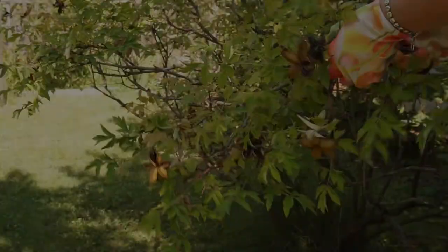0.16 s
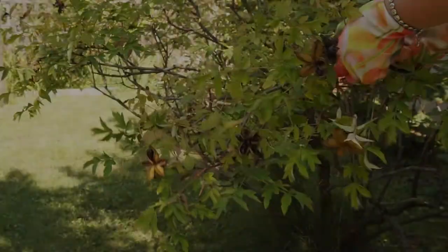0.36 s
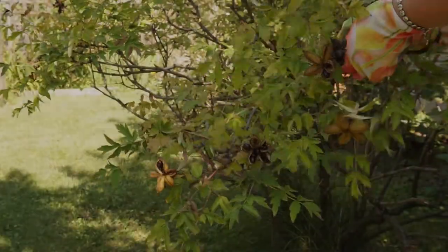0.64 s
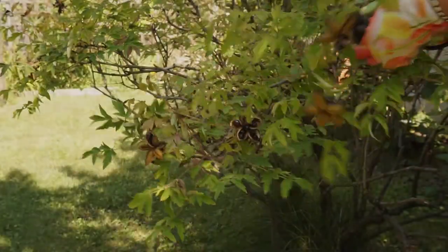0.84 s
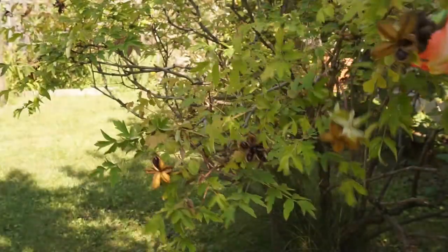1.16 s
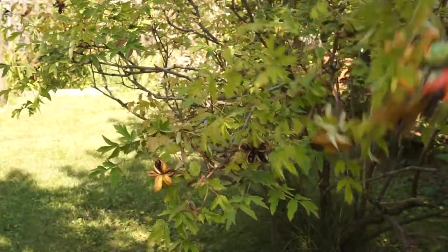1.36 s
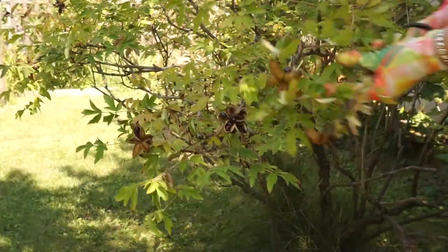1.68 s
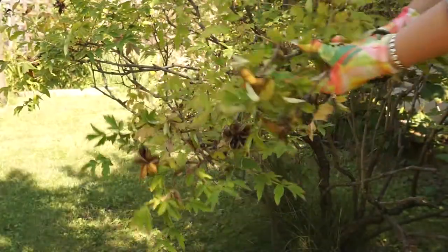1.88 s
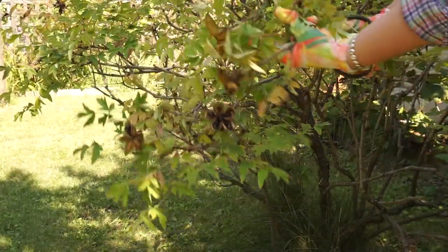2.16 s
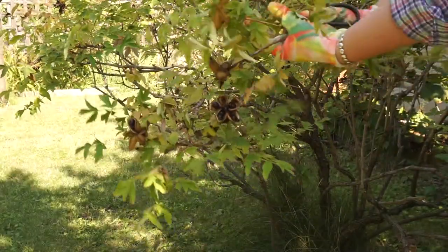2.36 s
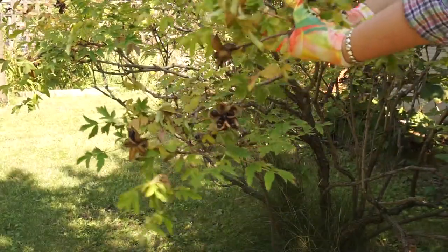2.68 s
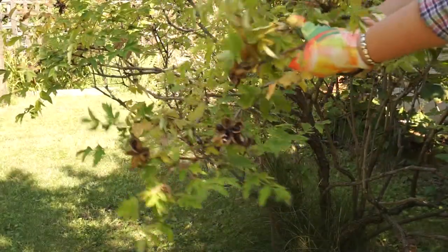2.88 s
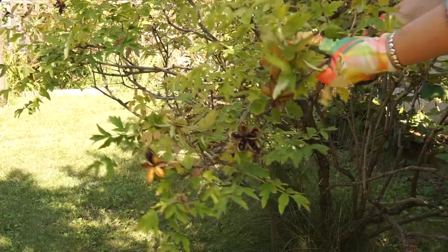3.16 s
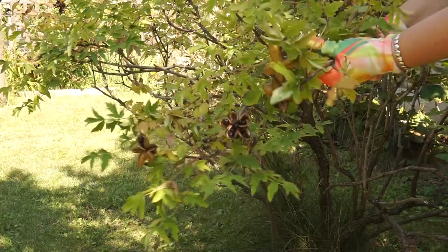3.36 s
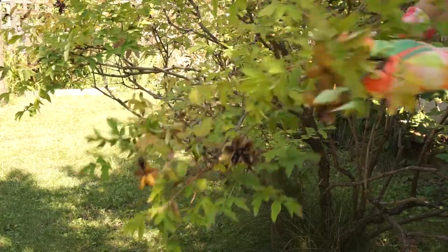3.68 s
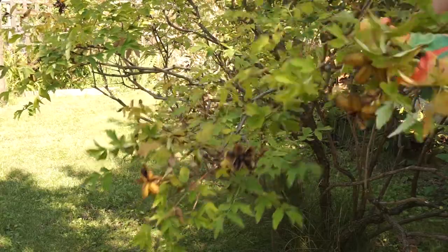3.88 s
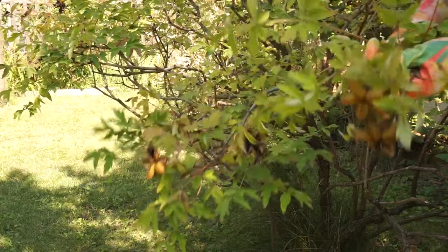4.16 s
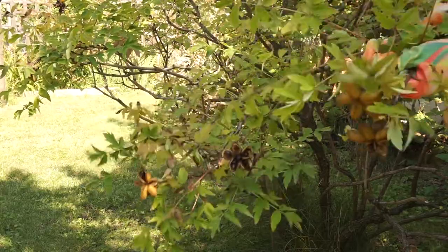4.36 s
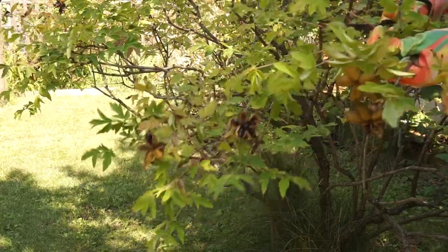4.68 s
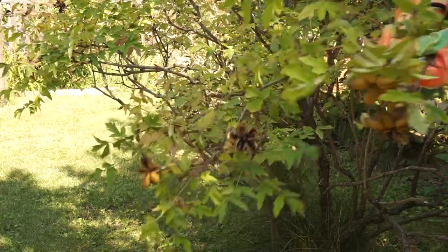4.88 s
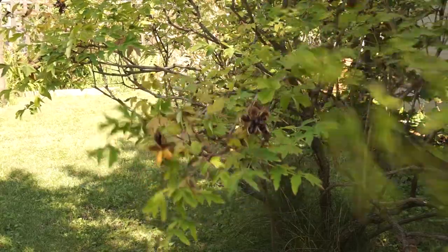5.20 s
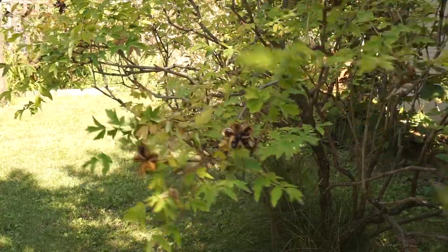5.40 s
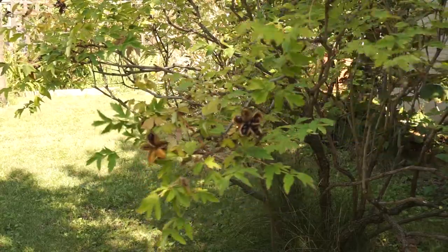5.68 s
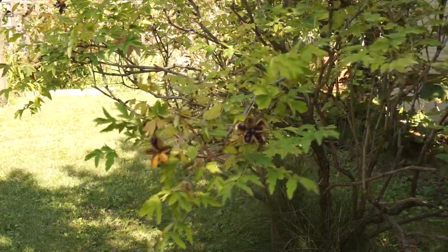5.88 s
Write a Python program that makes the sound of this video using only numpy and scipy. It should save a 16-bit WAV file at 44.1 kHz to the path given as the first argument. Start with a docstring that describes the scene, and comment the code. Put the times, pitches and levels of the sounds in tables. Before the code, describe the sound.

A quiet garden with a soft, steady outdoor hush and a very faint, high, fuzzy machine whine far away. Close by, a shrub is pruned: a tiny click at 0.5 s, a clearer snap near 0.67 s with a small rustle, and a light crack just before 1 s. From about 1.1 s a rooster crows once, dominating everything: a husky short note, two more brief notes around 1.35 and 1.7 s, then a long cry from 2.06 to 3.5 s, bright at first, growling and roughening as it falls and collapses, with a short outdoor echo. At 3.4 s a sharp double twig snap overlaps its end. A barely audible low tone trails at 3.6 s. Rustles and small snips follow around 3.7, 4.1, 4.4 and 4.8-4.9 s, then only leaf brushing near 5.2-5.5 and 5.9 s. The distant saw-like whine hisses and sags lowest around 4.3 s, then climbs back toward the end.

```python
"""Rooster and pruning in a garden

A rooster crows once: three short notes and a long falling one that breaks into a rasp. It is built from
gliding partials, half-pitch growl and puffed noise, with one wall echo and a faint low tone after it.
Close by, someone prunes a shrub: decaying noise bursts snap the twigs, grainy noise rustles the leaves.
Far off a machine, perhaps a saw, whines in narrow noise bands, sags under load and recovers,
over a soft outdoor hush of coloured noise."""
import sys
import numpy as np
from scipy import signal
from scipy.fft import rfft, irfft, next_fast_len
from scipy.io import wavfile
from scipy.ndimage import uniform_filter1d, map_coordinates

SR = 44100
rng = np.random.default_rng(int(sys.argv[2]) if len(sys.argv) > 2 else 0)


def generate_wav(signal):
    """Clip the signal to [-1, 1] and save it as 16-bit WAV at the path in sys.argv[1]."""
    frames = np.transpose(np.atleast_2d(signal))
    scaled = np.clip(frames, -1, 1) * 32767
    pcm = np.round(scaled).astype(np.int16)
    wavfile.write(sys.argv[1], SR, pcm)


N = 266364

# the four notes of the crow, with base levels:
# (start [s], end [s], third partial [dB], edge [dB], sheen [dB], huskiness at the start [0-1])
CROW_NOTES = [(1.073, 1.234, -52, -50, -46.5, 0.7), (1.348, 1.687, -46, -49, -57, .02),
              (1.684, 1.93, -48, -46.5, -55.5, 0.21), (2.058, 3.51, -57, -49, -50, 0)]
# the syrinx scoops up into each note; the last one sinks and collapses: (time [s], pitch [Hz])
CROW_PITCH = [
    [(1.09, 556.7), (1.108, 613.5), (1.125, 693), (1.3, 692)],
    [(1.34, 689.2), (1.39, 723), (1.416, 730), (1.552, 736.3), (1.67, 722.8)],
    [(1.73, 698.5), (1.79, 729.7), (1.91, 722.5), (1.95, 700)],
    [(2.07, 677.4), (2.11, 734.7), (2.14, 755.5), (2.16, 802.4), (2.196, 792), (2.41, 795.9), (2.51, 764.6),
     (2.542, 786), (2.58, 769), (2.7, 748.7), (2.76, 732.3), (2.83, 722.6), (2.88, 702.5), (3.18, 674),
     (3.3, 645.4), (3.318, 543), (3.37, 539.3), (3.47, 476.6), (3.58, 405)],
]
# strong partials of the short notes: (time [s], fundamental [dB], second [dB], fourth [dB])
SHORT_NOTE_LEVELS = [
    [(1.075, -57, -28.5, -62), (1.097, -44, -43, -44), (1.109, -30.5, -44.5, -55),
     (1.133, -35.5, -29, -40.5), (1.171, -32.5, -26.5, -35), (1.217, -31.5, -22.5, -44),
     (1.235, -31.5, -23.5, -42)],
    [(1.355, -53, -48, -59), (1.377, -27, -35, -37), (1.443, -32.5, -23.5, -46.5),
     (1.485, -35, -27.5, -39.5), (1.579, -39.5, -24.5, -43.5), (1.619, -30.5, -38.5, -39.5),
     (1.675, -34.5, -29, -40.5)],
    [(1.69, -34.5, -34.5, -52), (1.786, -31, -29.5, -40), (1.806, -39, -28, -49),
     (1.842, -36.5, -36.5, -51), (1.866, -36, -26, -43), (1.894, -32.5, -27.5, -80),
     (1.92, -39.5, -28.5, -41.5)],
]
# the same for the long note: (time [s], fundamental [dB], second [dB], fourth [dB])
LONG_NOTE_LEVELS = [(2.065, -32.5, -39.5, -52), (2.117, -45, -24.5, -44.5), (2.145, -28, -19.5, -62.5),
                    (2.161, -29, -26.5, -54), (2.231, -32, -24.5, -75), (2.259, -33, -25, -52),
                    (2.291, -34, -25, -77), (2.315, -33.5, -27.5, -86), (2.343, -34, -25, -54),
                    (2.401, -31, -33, -59), (2.421, -33.5, -25.5, -61), (2.477, -32, -37.5, -66),
                    (2.509, -33.5, -23, -53.5), (2.777, -42.5, -28.5, -55.5), (2.825, -61, -24.5, -64),
                    (2.853, -40.5, -34, -52), (2.947, -37.5, -23, -49.5), (3.003, -37, -35.5, -51),
                    (3.031, -38.5, -28.5, -61), (3.053, -39.5, -33, -40.5), (3.093, -51.5, -48, -42),
                    (3.141, -43, -34, -41), (3.169, -38.5, -47, -39), (3.199, -40, -27.5, -40.5),
                    (3.299, -34, -41.5, -54), (3.327, -42, -36, -41.5), (3.397, -47, -47, -50),
                    (3.445, -42.5, -34.5, -71), (3.481, -50, -40.5, -41), (3.52, -51, -37, -73)]
# the voice breaks at the edges of notes and when strained:
# (start [s], end [s], chaos [0-1], rasp [dB], half-pitch growl [dB])
VOICE_BREAKS = [(1.071, 1.076, 0.75, -38, -39), (1.105, 1.149, 0.27, -39, -47.5),
                (1.229, 1.243, 0.5, -36, -38.5), (1.345, 1.387, 0.37, -34.5, -39),
                (1.395, 1.5, 0.44, -53, -61), (1.677, 1.759, 0.63, -31.5, -38.5),
                (1.917, 1.938, 0.66, -38.5, -36.5), (1.95, 2.044, 0, -50, -47),
                (2.055, 2.083, .6, -33.5, -38.5), (2.151, 2.18, 0.02, -61, -58),
                (2.606, 2.707, 0.22, -44, -35.5), (2.715, 2.825, 0.32, -42, -32),
                (3.029, 3.296, 0.05, -53.5, -46), (3.285, 3.362, 0.18, -54, -42.5),
                (3.372, 3.42, 0.71, -41, -45), (3.469, 3.524, 0.48, -52, -47)]
# throat and beak colour of the puffed air: (frequency [Hz], relative level [dB])
RASP_COLOUR = [(200, -59), (380, -106), (600, -2.5), (780, -5), (1000, -15.5), (1500, -3), (1900, -4),
               (2300, -17.5), (2800, -9.5), (3300, -43), (6000, -49.5)]
# colour of the half-pitch growl: (frequency [Hz], relative level [dB])
GROWL_COLOUR = [(200, -28), (370, -24.5), (560, 2.5), (950, 0.5), (1130, -1), (1700, 6.5), (1850, 1.5),
                (1950, -9), (2150, -23), (2600, -23.5), (3500, -37)]
# colour of the brassy edge: (frequency [Hz], relative level [dB])
EDGE_COLOUR = [(2300, -71), (3300, 5), (3750, 21), (4000, 11), (4400, 12.5), (4800, 11), (5120, 14.5),
               (5500, -19), (5900, -5.5), (6400, -16.5), (7000, -34)]
# colour of the highest partials in a clear voice: (frequency [Hz], relative level [dB])
SHEEN_COLOUR = [(4700, -80), (5500, -4.5), (6300, -1), (7100, -6.5), (8000, -1.5), (8700, -0.5), (9500, -5),
                (10300, -11), (11200, -7), (13400, -1.5), (13900, -22.5), (16000, -18)]
# colour of the highest partials in a husky voice: (frequency [Hz], relative level [dB])
HUSKY_COLOUR = [(3000, -80), (4700, -17), (5400, 5.5), (5900, 10), (6500, -1.5), (7000, -7), (7700, -4),
                (9500, -9.5), (11200, -7.5), (12500, -21.5), (14000, -49)]
# reflections tip each frequency to one side: (frequency [Hz], left over right [dB])
SIDE_LEAN = [(600, 0.5), (675, 2), (705, -2), (722, -3.5), (735, -6.5), (765, 1), (795, -9.5), (1000, 3.5),
             (1300, 2.5), (1345, 7), (1385, -6.5), (1415, 0), (1445, 2.5), (1470, 6), (1540, -2.5),
             (1590, 6), (1700, -2)]
# a wall sends the crow back, to the left and the right ear: (delay [s], level [dB])
WALL_ECHOES = [(.048, -23.5), (.0484, -12.5)]
# twigs snapping: (time [s], relative level [dB], wood relative to crack [dB])
TWIG_SNAPS = [(0.5, -48, -2), (0.6599, -45, 12.5), (0.665, -30, 0.5), (0.6711, -40.5, 8.5),
              (0.976, -32, -32), (0.99, -49, -24), (1.276, -42, -9), (1.34, -37.5, -11), (1.568, -36.5, 4),
              (3.38, -26, 3.5), (3.387, -21.5, 3), (3.55, -43, -17), (3.676, -38.5, -5), (3.708, -44, -1),
              (4.127, -41.5, -8), (4.368, -42.5, 5), (4.799, -37.5, 3.5), (4.809, -40.5, 3.5),
              (4.893, -37, -20), (4.929, -46, -14)]
# resonances of the twig wood: (centre [Hz], width [Hz], relative level [dB])
TWIG_MODES = [(1030, 72, 1), (1950, 560, -1.5), (3440, 1230, -4.5)]
# colour of the crack: (frequency [Hz], relative level [dB])
CRACK_COLOUR = [(1500, -26.5), (3500, -7), (5500, 1), (9000, -1.5), (14000, -9), (16000, -0.5)]
# the shrub being handled: (height of the rustle [s], half length to 1/e [s], level [dB])
LEAF_RUSTLES = [(0.28, 0.062, -75), (0.708, 0.036, -62.5), (0.88, 0.027, -69.5), (1.419, 0.11, -55),
                (3.67, 0.18, -62.5), (4.118, 0.072, -63), (4.911, 0.044, -57.5), (5.207, 0.07, -62),
                (5.332, 0.067, -70), (5.494, 0.019, -64), (5.92, 0.073, -63)]
# colour of the leaves: (frequency [Hz], relative level [dB])
LEAF_COLOUR = [(300, -37), (1500, -28), (4000, -9.5), (7000, -8.5), (10000, -8), (13000, -14), (16000, -15)]
# the far machine sags under load and recovers: (time [s], reference pitch [Hz])
MACHINE_PITCH = [(0, 2840), (2.8, 2896), (3.6, 2525), (3.85, 2420), (4.33, 2350), (4.7, 2417), (5.05, 2524),
                 (5.25, 2627), (5.6, 2750), (6.04, 2813)]
# colour of the cutting hiss: (frequency [Hz], relative level [dB])
CUT_COLOUR = [(200, -55), (330, -7), (480, -20.5), (750, 5), (1500, -3), (2500, 6), (3300, 1), (5000, -4),
              (6800, -5), (9000, -13), (14000, -39)]
# colour of the outdoor hush: (frequency [Hz], relative level per Hz [dB])
HUSH_COLOUR = [(15, -76), (25, -53), (80, -37), (211, -23), (316, -22), (392, -13), (654, -13.5),
               (812, -5.5), (1040, -7), (1730, -6), (2810, -5.5), (3880, -12.5), (5670, -18.5),
               (7420, -22.5), (15800, -25)]
# slow level of the hush: (time [s], level [dB])
HUSH_LEVEL = [(0, -60.5), (0.5, -58.5), (1, -57), (5, -59.5), (6.04, -57.5)]
# how alike both ears hear noise: (frequency [Hz], left-right likeness [0-1])
EAR_LIKENESS = [(60, 1), (180, 0.46), (550, 0.8), (1650, 0.5), (4970, 0.039), (15000, 0.062)]
# decay of the garden echo: (frequency [Hz], time to fall 60 dB [s])
GARDEN_DECAY = [(300, 0.54), (1200, 0.82), (4000, 0.84), (12000, 0.022)]

ATTACK_S, RELEASE_T60_S = 0.011, 0.17  # of every note
SHEEN_LATE_DB, SHEEN_BUILD_S = 16, 0.16  # the highest partials build up after each onset
TIRES_AFTER_S, TIRES_OVER_S = 0.25, 0.58  # a held note turns husky as the air runs out
BREAK_RISE, BREAK_T60_S = 0.18, 0.21  # share of a break's length that it swells for; how fast it settles
CALM_CHAOS, CALM_RASP_DB = 0.038, -71.5  # a trace of each in every note
CUT_START_S, CUT_END_S, CUT_ATTACK_S, CUT_T60_S, CUT_DB = 2.4, 4.316, 0.45, 2.66, -54  # one cut
IDLE_HZ = 2900  # reference from which the sag is counted
WHINE_DB, WHINE_DB_PER_HZ = -72.5, 0.0422  # louder the more it sags
OCTAVE_DB, OCTAVE_DB_PER_HZ = -78.5, 0.0226
TOP_HZ = 15900


def rooster(jitter=0.09, shimmer=0.85, flutter=1.0, drift=0.00256, fade_db=5.0, grain_db=6, breathy=0.34,
            hiss=0.72, edge_hiss=2.0, husky_hiss=1.8, spread=1.0, doubling=0.2, bright_lean_db=-2,
            husky_third_db=5, husky_edge_db=-9, collapse_db=-12, dull_db=-7, low_hz=200, swell_db=1):
    """The syrinx beats cleanly, at every second cycle, or chaotically; throat and beak colour it."""
    pitch, = curves(CROW_PITCH)
    first, second, fourth = uniform_filter1d(curves(SHORT_NOTE_LEVELS, LONG_NOTE_LEVELS), size=300)
    sounding, age, third, edge, sheen, husky = notes()
    chaos, rasp, growl = breaks()
    tired = np.maximum(age - TIRES_AFTER_S, 0) / TIRES_OVER_S
    husky = np.clip(husky + tired, 0, 1)

    # uneven cycle lengths smear the high partials first
    phase = 2 * np.pi * np.cumsum(pitch * (1 + drift * wobble(70))) / SR
    phase = phase + chaos * jitter * (wobble(420) + wobble(110))
    # as the pitch collapses, the next higher partials slide into the resonances
    sunk = np.clip((620 - pitch) / 50, 0, 1)

    def partial(order):
        """A sine at a multiple of the pitch, its level shaken by chaos."""
        shake = shimmer * wobble(260) + flutter * wobble(70)
        return np.sqrt(2) * np.sin(order * phase) * (1 + chaos * shake)

    def overtone(order):
        """A partial that hands over to the next one as the pitch sinks."""
        return (1 - sunk) * partial(order) + sunk * partial(order + 1)

    def fading():
        """Each high partial swells and fades on its own, and flickers when the voice is rough."""
        return amp(fade_db * wobble(18) + grain_db * np.sqrt(chaos) * wobble(90))

    voice = panned(amp(first) * partial(order=1), along(SIDE_LEAN, pitch))
    second_gain = amp(second + swell_db * wobble(21.61))
    voice += panned(second_gain * overtone(order=2), along(SIDE_LEAN, 2 * pitch))
    voice += amp(third + husky_third_db * husky + collapse_db * sunk) * overtone(order=3)
    voice += amp(fourth) * overtone(order=4)
    voice *= np.sqrt(np.clip(1 - 0.85 * chaos, 0, 1))

    # period doubling puts lines halfway between the partials
    halves = coloured(sum(partial(k + .5) for k in range(5)), GROWL_COLOUR)
    growling = (1 - sunk / 2) * halves + sunk * partial(order=2) / 2
    rough = growl * np.sqrt(1 - chaos / 2) * growling
    # turbulent air escapes in one puff per cycle
    puffs = air_noise() * (1 + np.cos(phase))
    rough = rough + (rasp + amp(CALM_RASP_DB) * sounding) * coloured(puffs, RASP_COLOUR)

    # high partials start at their own phase in each ear
    buzz = sum(fading() * np.sin(k * phase + rng.uniform(0, spread * np.pi, (2, 1))) for k in range(5, 24))
    half_buzz = sum(fading() * np.sin((k + .5) * phase) for k in range(7, 10))
    buzz = steady(buzz + doubling * husky * half_buzz)
    air = np.clip(breathy * husky ** 2 + (hiss + husky_hiss * husky) * chaos, 0, 1)
    brassy = buzz + edge_hiss * chaos * unit(puffs)
    airy = np.sqrt(1 - air) * buzz + np.sqrt(air) * unit(puffs)
    top = np.sqrt(1 - husky) * coloured(airy, SHEEN_COLOUR) + np.sqrt(husky) * coloured(airy, HUSKY_COLOUR)
    bright = amp(edge + husky_edge_db * husky) * steady(coloured(brassy, EDGE_COLOUR))
    bright += amp(sheen - SHEEN_LATE_DB * np.exp(-age / SHEEN_BUILD_S)) * steady(top)
    voice += amp(dull_db * sunk) * bright * panned(np.ones(1), bright_lean_db)
    # so small a throat radiates no bass
    return without_bass(voice * sounding + rough, low_hz)


def notes():
    """Per sample: how open the voice is, the age of the current note and that note's colour columns."""
    t, rows = np.arange(N) / SR, np.array(CROW_NOTES)
    current = np.maximum(np.searchsorted(rows[:, 0], t) - 1, 0)
    start, _, *colour = rows[current].T
    openings = [envelope(a, b, ATTACK_S, RELEASE_T60_S) for a, b, *_ in CROW_NOTES]
    return np.max(openings, axis=0), np.maximum(t - start, 0), *colour


def breaks():
    """Chaos, rasp gain and growl gain: each break swells, holds and settles quickly."""
    shapes = []
    for start, end, chaos, rasp, growl in VOICE_BREAKS:
        swell = envelope(start, end, BREAK_RISE * (end - start), BREAK_T60_S)
        shapes.append(np.outer([chaos, amp(rasp), amp(growl)], swell))
    chaos, rasp, growl = np.max(shapes, axis=0)
    return np.clip(chaos + CALM_CHAOS, 0, 1), rasp, growl


def groan(pitch_hz=325, waver=.025, level_db=-71, start=3.59, end=3.8, attack=.04, t60=.5):
    """A faint low tone trails the crow as the syrinx slackens."""
    tone = np.sin(2 * np.pi * np.cumsum(pitch_hz * (1 + waver * wobble(60))) / SR)
    return amp(level_db) * envelope(start, end, attack, t60) * tone


def wall(x):
    """One distinct echo per ear; it beats with the voice whenever the pitch moves."""
    def delays(hz):
        return np.array([amp(db) * np.exp(-2j * np.pi * hz * s) for s, db in WALL_ECHOES])
    return filtered(x.mean(axis=0), delays)


def snaps(crack_t60=0.015, knock_t60=0.02, crack_db=-5, knock_db=-5, shake_db=-22, shake_t60=0.2,
          lean_db=-2, low_hz=520):
    """Each twig cracks, knocks with its wood and leaves the foliage shivering."""
    crack, knock, t = np.zeros(N + SR), np.zeros(N + SR), np.arange(SR // 4) / SR
    for s, db, wood_db in TWIG_SNAPS:
        here = slice(round(s * SR), round(s * SR) + len(t))
        crack[here] += amp(db) * (amp(-60 * t / crack_t60) + amp(shake_db - 60 * t / shake_t60))
        knock[here] += amp(db + wood_db - 60 * t / knock_t60)

    def wood(hz):
        """Resonances of alternating sign."""
        return sum((-1) ** k * amp(db) * 1j * hz * width / (centre ** 2 - hz ** 2 + 1j * hz * width)
                   for k, (centre, width, db) in enumerate(TWIG_MODES))

    sound = amp(crack_db) * crack[:N] * coloured(air_noise(), CRACK_COLOUR)
    sound = sound + amp(knock_db) * knock[:N] * unit(filtered(air_noise(), wood))
    # thin twigs radiate no bass
    return without_bass(sound, low_hz) * panned(np.ones(1), lean_db)


def leaves(rest_db=-80, grain_db=4, lean_db=-3):
    """Leaves brush each other in dense tiny ticks, swelling with each pull at the shrub."""
    t = np.arange(N) / SR
    pulls = sum(amp(db) * np.exp(-((t - s) / half) ** 2) for s, half, db in LEAF_RUSTLES)
    ticks = air_noise() * amp(grain_db * wobble(500) + 2.8 * wobble(60))
    return (amp(rest_db) + pulls) * steady(coloured(ticks, LEAF_COLOUR)) * panned(np.ones(1), lean_db)


def garden(x, delay=.018):
    """Fences and trees scatter a short, thin echo: noise that decays at its own rate per frequency."""
    hz, t, z = signal.stft(rng.standard_normal((2, SR // 2)), SR, nperseg=256)
    decay = amp(-60 * t / along(GARDEN_DECAY, hz)[:, None])
    tail = signal.istft(z * decay, SR, nperseg=256)[1]
    late = np.pad(x.mean(axis=0), (round(delay * SR), 0))
    return signal.fftconvolve(late[None], tail / np.linalg.norm(tail[0]), axes=1)[:, :N]


def saw(width_hz=95, octave_width_hz=230, lean_db=-3, cutting_octave_db=9):
    """A fuzzy whine and its octave; under load the blade slows and the cut hisses."""
    pitch, = curves(MACHINE_PITCH)
    cut = envelope(CUT_START_S, CUT_END_S, CUT_ATTACK_S, CUT_T60_S)
    sag = IDLE_HZ - pitch
    whine_db = WHINE_DB + WHINE_DB_PER_HZ * sag
    octave_db = OCTAVE_DB + OCTAVE_DB_PER_HZ * sag + cutting_octave_db * cut
    phase = 2 * np.pi * np.cumsum(pitch) / SR

    def band(k, width):
        """Narrow noise riding on a multiple of the pitch, partly shared by the ears."""
        def blur():
            return unit(filtered(rng.standard_normal((3, N)), lambda hz: 1 / (1 + (hz / width) ** 2)))
        shared, left, right = blur() * np.cos(k * phase) + blur() * np.sin(k * phase)
        return unit(shared + 2.0 * np.array([left, right]))

    sound = amp(whine_db) * band(0.99, width_hz)  # just under the reference pitch
    sound = sound + amp(octave_db) * band(2, octave_width_hz)
    sound = sound + amp(CUT_DB) * cut * coloured(air_noise(), CUT_COLOUR)
    return sound * panned(np.ones(1), lean_db)


def hush(lean_db=-2):
    """Distant outdoor noise, barely stirring."""
    level, = curves(HUSH_LEVEL)
    return amp(level + 0.3 * wobble(7.9)) * coloured(air_noise(), HUSH_COLOUR) * panned(np.ones(1), lean_db)


def air_noise():
    """White stereo noise, its left-right likeness set per frequency by a mid and a side part."""
    def mid_side(hz):
        turn = np.arccos(np.clip(along(EAR_LIKENESS, hz), -1, 1)) / 2
        return np.array([np.cos(turn), np.sin(turn)])
    mid, side = filtered(rng.standard_normal((2, N)), mid_side)
    return np.array([mid + side, mid - side])


def amp(db):
    """Decibels to gain."""
    return 10 ** (np.asarray(db) / 20)


def unit(x):
    """Scale to rms 1."""
    return x / np.sqrt(np.mean(x ** 2) + 1e-20)


def steady(x):
    """Hold the short-term rms near 1."""
    return x / np.sqrt(np.abs(uniform_filter1d(np.mean(x ** 2, axis=0), size=1500)) + 1e-9)


def envelope(start, end, attack, t60):
    """Rise from start, hold until end, then die away."""
    t = np.arange(N) / SR
    return np.clip((t - start) / attack, 0, 1) * amp(-60 * np.maximum(t - end, 0) / t60)


def along(points, hz):
    """Read (frequency [Hz], value) points on a log frequency axis."""
    f, v = np.transpose(points)
    return np.interp(np.log(hz + 1), np.log(f + 1), v)


def curves(*tables):
    """One value per sample for each column after the time; several tables are merged in time order."""
    rows = np.vstack([np.vstack(table) for table in tables])
    s, *cols = rows[np.argsort(rows[:, 0])].T
    return [np.interp(np.arange(N) / SR, s, c) for c in cols]


def wobble(rate):
    """A smooth random curve, rate knots a second."""
    return map_coordinates(rng.standard_normal(int(N * rate / SR) + 4), [np.arange(N) * rate / SR])


def filtered(x, response):
    """x times a response of frequency."""
    m = next_fast_len(N + SR // 4)
    return irfft(rfft(x, m) * response(np.fft.rfftfreq(m, 1 / SR)), m)[..., :N]


def coloured(x, spectrum):
    """x through a (frequency [Hz], level [dB]) colour, at rms 1."""
    return unit(filtered(x, lambda hz: amp(along(spectrum, hz))))


def without_bass(x, low_hz):
    """Roll off gently below low_hz."""
    return signal.sosfilt(signal.butter(2, low_hz, "high", fs=SR, output="sos"), x)


def panned(x, lean_db):
    """Left and right copies, lean_db apart."""
    return np.array([x * amp(lean_db / 2), x * amp(-lean_db / 2)]) / np.cosh(np.log(amp(lean_db / 2)))


def scene(echo_db=-18):
    """The bird and the pruning with their echo, over the far sounds."""
    bird = rooster()
    near = bird + snaps()
    echoes = wall(bird) + amp(echo_db) * garden(near)
    return near + echoes + groan() + leaves() + saw() + hush()


def record(dry):
    """Nothing is kept at or above the band limit."""
    return filtered(dry, lambda hz: hz < TOP_HZ)


dry = scene()
out = record(dry)
generate_wav(out)
```